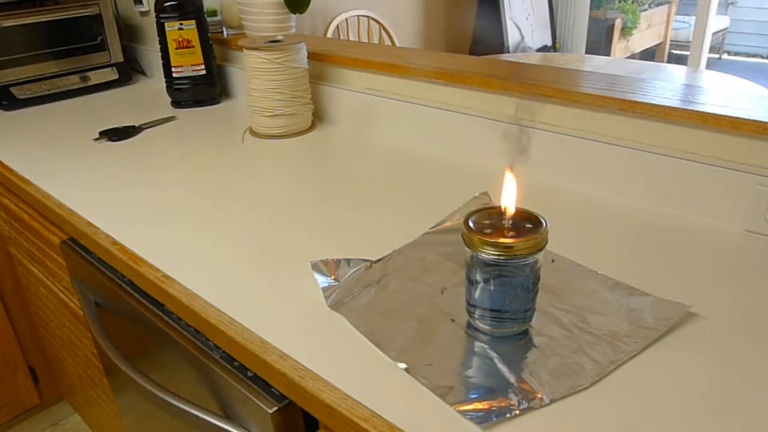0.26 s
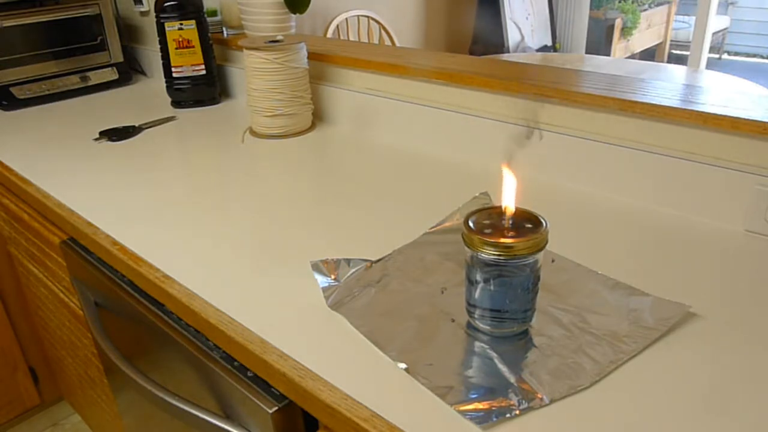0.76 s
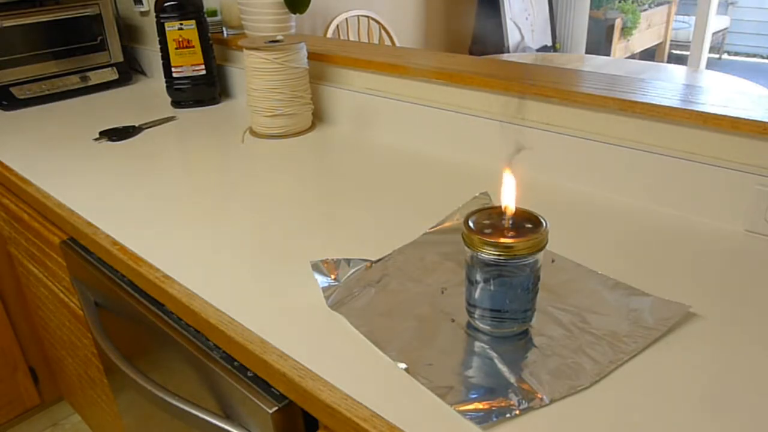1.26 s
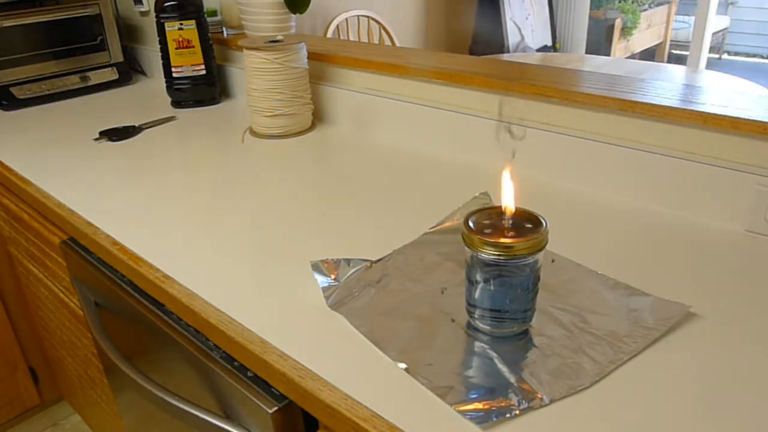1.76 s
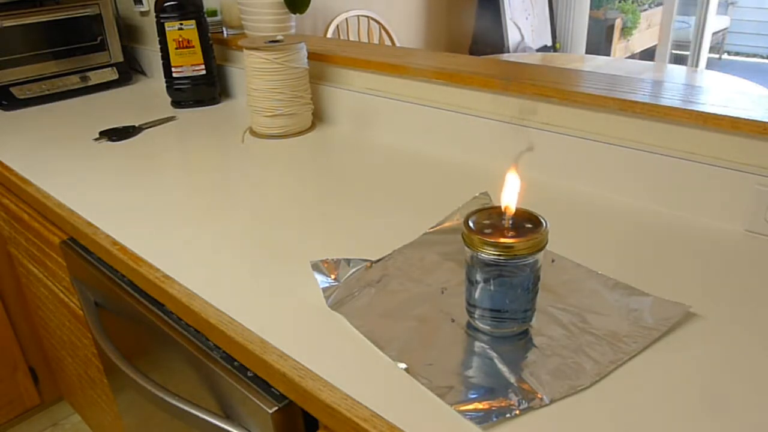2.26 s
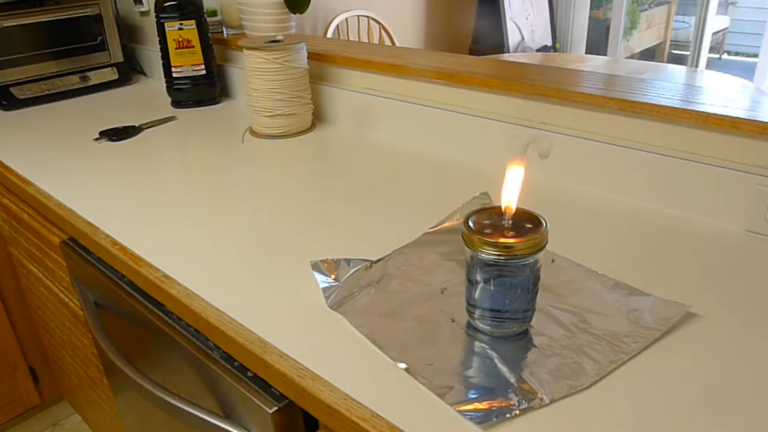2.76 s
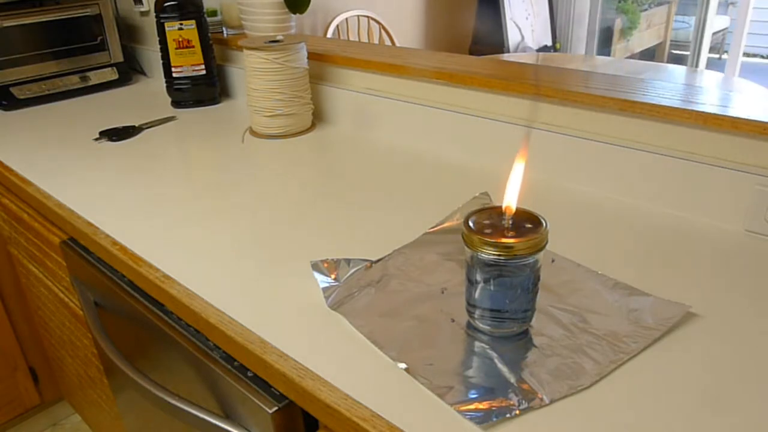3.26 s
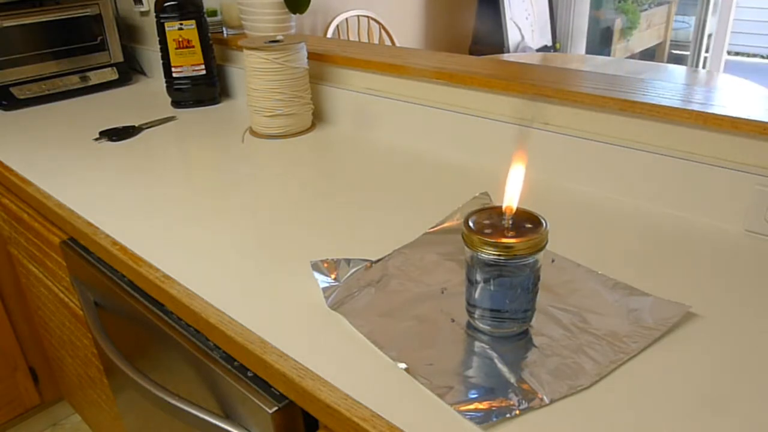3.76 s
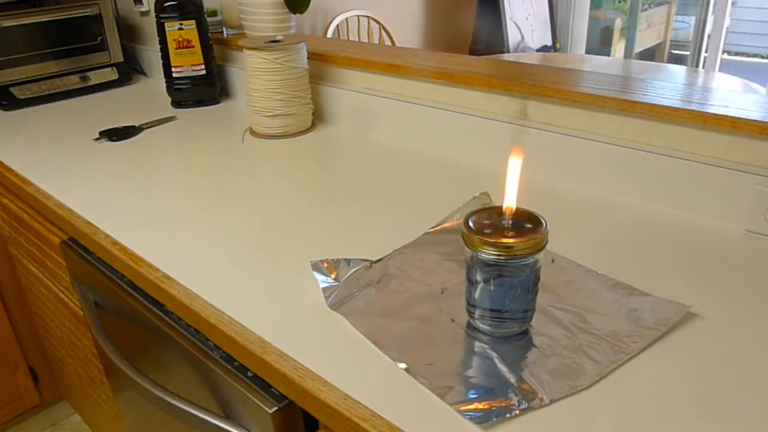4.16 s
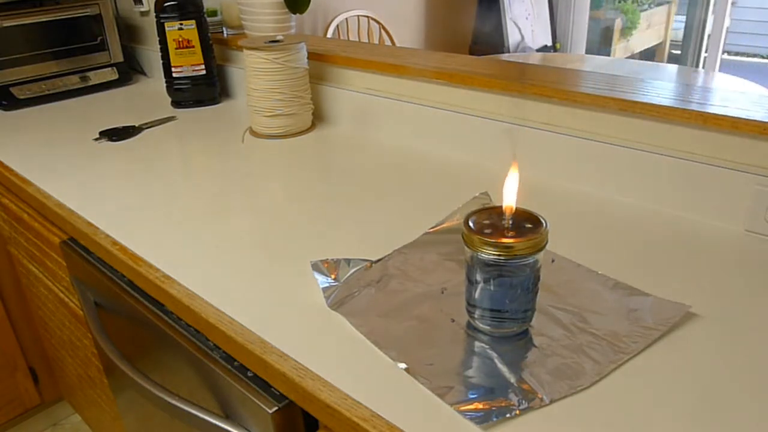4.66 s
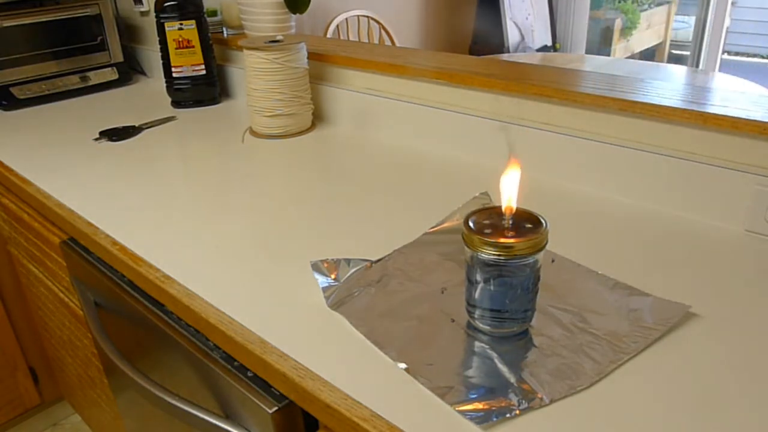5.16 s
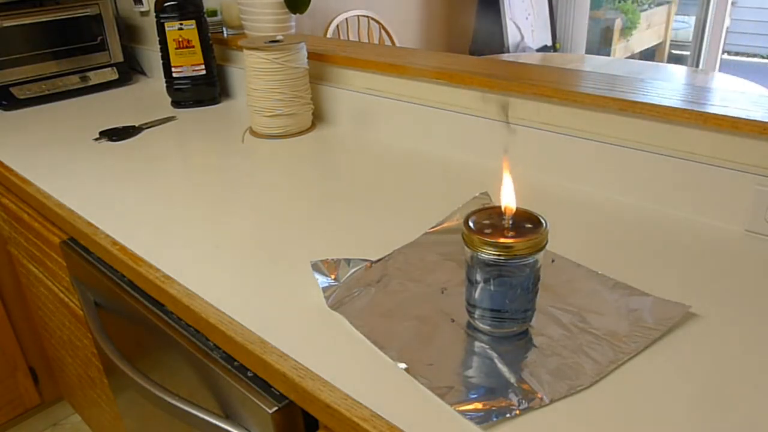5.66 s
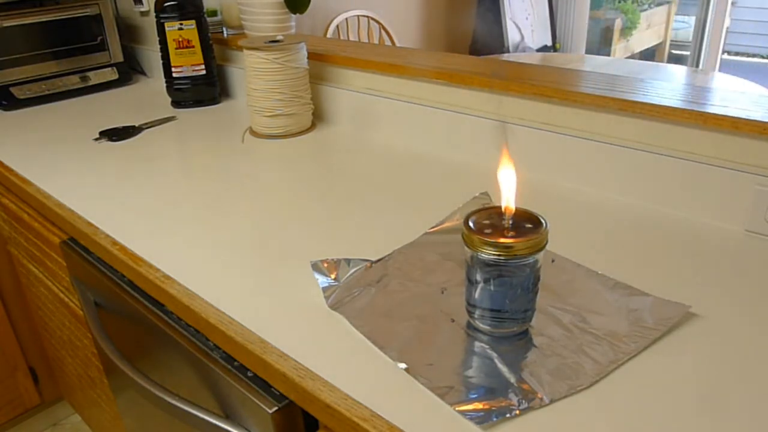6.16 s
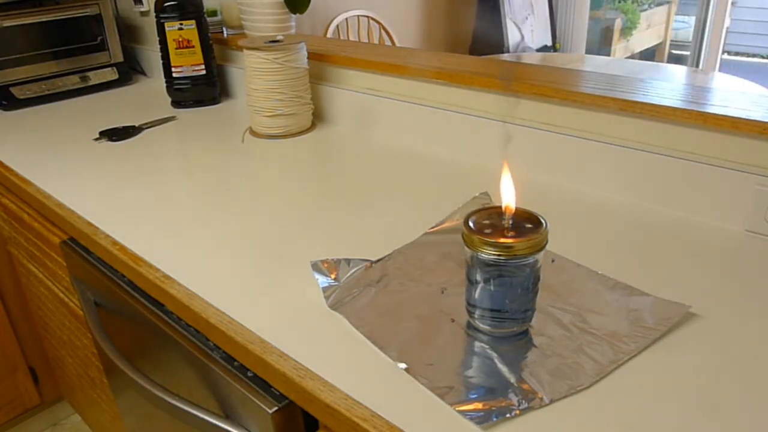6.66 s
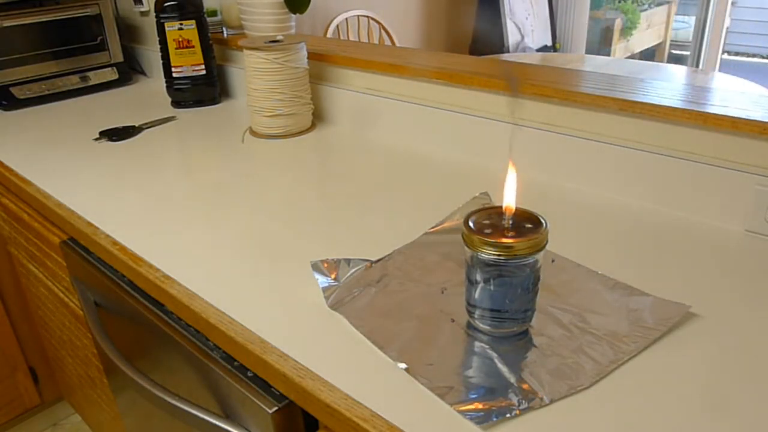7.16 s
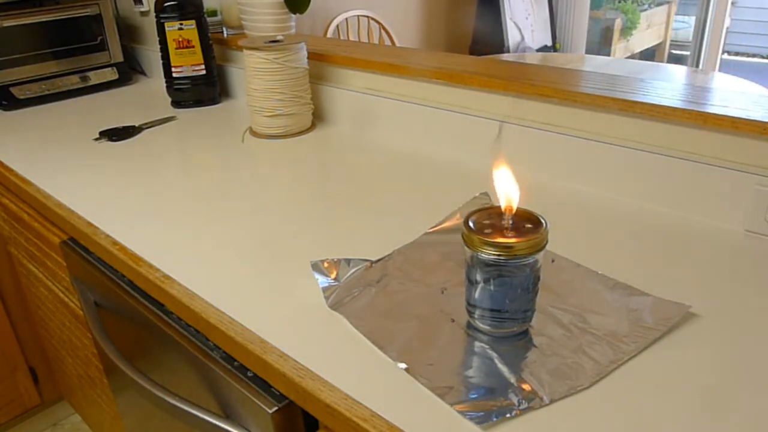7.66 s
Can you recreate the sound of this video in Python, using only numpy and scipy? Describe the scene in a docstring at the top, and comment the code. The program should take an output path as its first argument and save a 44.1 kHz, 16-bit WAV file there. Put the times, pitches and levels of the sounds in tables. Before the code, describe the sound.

Indoors over a faint appliance hum, a window unlatches, rolls roughly with ticking rollers in two shoves, then ends with a hard knock.

```python
"""A sliding window sash rolls along its gritty track in two pushes: slip noise and jolts drive track colours and modes,
and a roller ticks once a turn. Before that the latch knocks, rings frame and pane, and the sash scrapes free.
The seal hisses near the end of the travel; the sash slams on its stop, and faint stick-slip scuffs follow.
A hard-walled room, made of decaying noise, answers all but the track's ring and the low rush of an appliance."""
import sys
import numpy as np
from scipy import signal
from scipy.fft import rfft, irfft
from scipy.io import wavfile

SR = 44100
rng = np.random.default_rng(int(sys.argv[2]) if len(sys.argv) > 2 else 0)


def to_wav(sig):
    """Store sig (one row per channel, or 1-D mono) as 16-bit WAV at the path in sys.argv[1].

    Samples outside -1..1 are clipped; the rate is SR.
    """
    pcm = np.clip(np.atleast_2d(sig), -1, 1) * 32767
    pcm = np.round(pcm).astype(np.int16)
    wavfile.write(sys.argv[1], SR, pcm.T)  # frames by channels


N = 348869
TIME = np.arange(N) / SR
# Levels in dB are drive levels ahead of layer gain, colouring and room, unless marked rms.


def undb(db):
    """Decibels to amplitude gain."""
    return 10 ** (np.asarray(db) / 20)


def unit(x):
    """Scale to rms 1."""
    return x / np.sqrt(np.mean(x ** 2))


def on_log(hz, points):
    """Interpolate (hz, value) points on a log-frequency axis."""
    point_hz, value = np.transpose(points)
    return np.interp(np.log(np.maximum(hz, 1)), np.log(point_hz), value)


def through(x, response):
    """Convolve with an impulse response scaled to unit energy."""
    return signal.fftconvolve(x, response / np.linalg.norm(response))[:len(x)]


def colour(x, points, size=4096):
    """Minimum-phase filter with the given spectrum, by folding the cepstrum."""
    bin_hz = np.arange(size // 2 + 1) * SR / size
    cepstrum = irfft(np.log(undb(on_log(bin_hz, points))))
    cepstrum[1:size // 2] *= 2
    cepstrum[size // 2 + 1:] = 0
    return through(x, irfft(np.exp(rfft(cepstrum))))


def decay(t, t60_s):
    """Exponential decay by 60 dB in t60_s."""
    return np.exp(-np.log(1000) * t / t60_s)


def ring(x, modes):
    """Drive a set of decaying modes."""
    t = TIME[:SR // 2]
    response = sum(undb(db) * np.cos(2 * np.pi * hz * t) * decay(t, t60_s) for hz, db, t60_s in modes)
    return through(x, response)


def walk(rate_hz):
    """Random line through rate_hz points per second; rms 1."""
    return unit(np.interp(TIME * rate_hz, np.arange(N // 8), rng.standard_normal(N // 8)))


def slips(rate_hz, spread_db):
    """Tiny impacts of uneven size and random sign at a mean rate; rms 1."""
    size = undb(spread_db * np.minimum(rng.exponential(size=N), 4))
    hit = rng.random(N) < rate_hz / SR
    return unit(hit * size * rng.choice([-1, 1], N))


def add(out, start_s, x):
    """Mix a short sound in at start_s."""
    start = int(start_s * SR)
    out[start:start + len(x)] += x[:N - start]


def chatter(seconds, size=8192):
    """Force of one blow: micro-contacts that build up and die away; unit energy."""
    t = TIME[:size] / seconds
    fade = np.exp(-t) * (1 - np.exp(-2 * t))
    spectrum = rfft(rng.standard_normal(size) * fade)
    flat = irfft(spectrum / np.abs(spectrum))
    force = flat * np.sqrt(fade)
    return force / np.linalg.norm(force)


def stroke(start_s, attack_s, hold_s, release_db_per_s, swell_db_per_s=0):
    """Envelope of one movement: rise, hold (swelling or sagging), release."""
    t = TIME - start_s - attack_s
    rise = np.clip(1 + t / attack_s, 0, 1)
    swell_db = swell_db_per_s * np.clip(t, 0, hold_s)
    release_db = release_db_per_s * np.maximum(t - hold_s, 0)
    return rise * undb(swell_db - release_db)


# reverberation: freq_hz, t60_s
ROOM_DECAY = [(100, 1), (500, 0.57), (2000, 0.64), (5000, 0.61), (8000, 0.51), (14000, 0.36)]


def room(x, direct_db, early_db, early_s=.012):
    """Direct sound, close reflections off the window recess and a diffuse tail with its own t60 per band."""
    hz, t, cells = signal.stft(rng.standard_normal(SR), SR, nperseg=256)
    fading = cells * decay(t, on_log(hz, ROOM_DECAY)[:, None])
    tail = signal.istft(fading, SR)[1][:SR]
    response = tail / np.linalg.norm(tail)
    add(response, 0, undb(early_db) * chatter(early_s))
    response[0] += undb(direct_db)
    return through(x, response)


def scattered(x, direct_db, early_db, count=5):
    """A large sash radiates from shifting spots, each with reflections of its own."""
    shares = np.array([walk(50) for _ in range(count)])
    shares /= np.linalg.norm(shares, axis=0)
    echoes = sum(room(x * share, -np.inf, early_db) for share in shares)
    return (undb(direct_db) * x + echoes) / np.hypot(undb(direct_db), 1)


# spectrum of the air rush: freq_hz, density_db_per_hz
AIR_SPECTRUM = [(25, -57), (50, -17.5), (100, -13.5), (160, -8.5), (230, 1.5), (380, -10), (600, -11.5),
                (1100, -18), (2000, -21), (4000, -28.5), (8000, -34), (15500, -43.5)]
# slow gain heard on the air rush, sinks by the slam, then recovers: time_s, gain_db
AIR_GAIN = [(1.2, -2), (5.6, -3.5), (6.5, -2.5), (7.9, 0.5)]
# motor tones: pitch_hz, rms_db
MOTOR_TONES = [(1200, -62), (1443, -66), (2283, -66), (14923, -75.5)]
AIR_DB, DUCT_DB = -41.5, -49
TONE_WANDER_HZ = 3.61


def appliance():
    """Wavering noise for the rush of air, a duct mode, and thin motor tones of unsteady pitch."""
    gain_db = np.interp(TIME, *np.transpose(AIR_GAIN))
    rush = colour(rng.standard_normal(N), AIR_SPECTRUM) * undb(AIR_DB + .5 * walk(6))
    duct = undb(DUCT_DB) * ring(rng.standard_normal(N), [(215, 0, .05)])
    tones = np.zeros(N)
    for hz, rms_db in MOTOR_TONES:
        phase = 2 * np.pi * np.cumsum(hz + TONE_WANDER_HZ * walk(25)) / SR
        tones += undb(rms_db) * unit(np.sin(phase))
    return (rush + duct) * undb(gain_db) + tones


def rubs(rows, spectrum, slip_rate_hz):
    """Short bursts of stick-slip, each with a squeak mode of its own."""
    out = np.zeros(N)
    grain = slips(slip_rate_hz, 1.9)
    t = TIME[:SR // 4]
    for start_s, level_db, length_s, squeak_hz, squeak_db, squeak_cycles in rows:
        press = np.sin(np.pi * np.minimum(t / length_s, 1))
        burst = unit(np.roll(grain, -int(start_s * SR))[:len(t)])
        force = undb(level_db) * press * burst
        mode = [(squeak_hz, 0, squeak_cycles / squeak_hz)]
        squeak = unit(ring(ring(force, mode), mode)) * np.std(force)  # twice: steep skirts
        add(out, start_s, colour(force, spectrum) + undb(squeak_db) * squeak)
    return scattered(out, direct_db=-3, early_db=-2)


# faint scuffs: start_s, level_db, length_s, squeak_hz, squeak_db, squeak_t60_cycles (per pass)
SCUFFS = [(5.705, -70, .05, 4270, 9, 35), (6.165, -45, .065, 414, -10, 4.6),
          (6.295, -59, 0.027, 403, 14, 3.6), (6.714, -48, 0.044, 6740, -1.5, 12),
          (7.675, -45, 0.051, 6560, -4.5, 5.9)]
# spectrum of a scuff: freq_hz, density_db_per_hz
SCUFF_SPECTRUM = [(40, -27), (150, -20), (350, 9.5), (700, 9.5), (1200, 3.5), (2300, 2), (4000, -6.5),
                  (7000, -11.5), (15000, -53)]


def scuffs():
    """Faint stick-slip bursts after the sash has stopped."""
    return undb(8) * rubs(SCUFFS, SCUFF_SPECTRUM, slip_rate_hz=3000)


# latch and loose-sash knocks: start_s, level_db, edge_db, thud_db, chatter_s
KNOCKS = [(1.326, -34, -10, -14, 0.018), (1.349, -30.5, -26, -16, .011), (1.383, -21, -18, -13, 0.027),
          (1.645, -31, -6, -14, 0.015), (3.799, -37, -24, 6, 0.026), (3.927, -26, -2, -3, 0.017),
          (4.926, -30, 4.5, 4, 0.016), (5.0416, -29, -11, -3, 0.0076), (5.056, -31, -19, -2, 0.064)]
# latch and end-stop slams: start_s, level_db, edge_db, thud_db, wedge_s, rebound_s
SLAMS = [(1.4312, -20, 5.5, -18, .008, .012), (5.1372, -16, 6, -4.5, .024, 0.0039)]
SLAM_CHATTER_S = .0042
WEDGE_DB, WEDGE_EDGE_DB, REBOUND_DB = -1, -13, -6  # re slam


def blows():
    """Contacts as (start_s, force, edge_db, thud_db): a slam wedges in, strikes, rebounds; a knock is one touch."""
    for start_s, level_db, edge_db, thud_db, wedge_s, rebound_s in SLAMS:
        wedge = undb(level_db + WEDGE_DB) * chatter(wedge_s)
        strike = undb(level_db) * chatter(SLAM_CHATTER_S)
        rebound = undb(level_db + REBOUND_DB) * chatter(rebound_s)
        yield start_s - wedge_s, wedge, edge_db + WEDGE_EDGE_DB, thud_db
        yield start_s, strike, edge_db, thud_db
        yield start_s + rebound_s, rebound, edge_db, thud_db
    for start_s, level_db, edge_db, thud_db, chatter_s in KNOCKS:
        yield start_s, undb(level_db) * chatter(chatter_s), edge_db, thud_db


# spectrum of the crack: freq_hz, density_db_per_hz
KNOCK_SPECTRUM = [(100, -37), (290, 9.5), (480, 0), (750, 3.5), (1700, 6.5), (2800, 1), (5500, -5.5),
                  (8000, -12.5), (15000, -31)]
# spectrum of the metallic edge: freq_hz, density_db_per_hz
EDGE_SPECTRUM = [(1500, -23), (3500, -8), (5500, -6.5), (8000, -13.5), (11000, -13.5), (15500, -28)]
# frame modes: pitch_hz, level_db, t60_s
FRAME_MODES = [(275, -12, .35), (1222, -7, .18), (1443, -9, .25), (1660, -3, .33), (1790, -1, .18),
               (2100, -5, .17), (2433, -5, .17), (3875, -10, .22), (4245, -12, .18), (5140, -12, .18),
               (5618, -10, .22)]
# boom of the pane: freq_hz, density_db_per_hz
PANE_SPECTRUM = [(35, -22), (60, -11), (90, -2), (130, 0), (200, -4), (400, -25)]
PANE_SWAY_S = 0.032  # the heavy pane takes up a blow slowly


def knocks():
    """Latch, loose sash and end stop: each blow cracks, rings the frame and shakes the heavy pane."""
    body, edge, thud = np.zeros((3, N))
    for start_s, force, edge_db, thud_db in blows():
        add(body, start_s, force)
        add(edge, start_s, force * undb(edge_db))
        add(thud, start_s, force * undb(thud_db))
    sway = through(thud, chatter(PANE_SWAY_S))
    crack = room(undb(25.5) * colour(body, KNOCK_SPECTRUM), direct_db=-1, early_db=-5)
    click = room(undb(22.5) * colour(edge, EDGE_SPECTRUM), direct_db=2.5, early_db=1.5)
    frame = room(undb(10.5) * ring(body, FRAME_MODES), direct_db=-3, early_db=-1)
    pane = room(undb(20) * colour(sway, PANE_SPECTRUM), direct_db=0, early_db=-15)
    return crack + click + frame + pane


# damped bumper at the end of the track: freq_hz, density_db_per_hz
BUMPER_SPECTRUM = [(150, -35), (450, -8), (750, 13), (1300, -11), (2500, -7), (8000, -30)]


def bumper(start_s=5.1378):
    """The sash meets its end stop with a short, dead thwack."""
    force = np.zeros(N)
    add(force, start_s, chatter(0.0022))
    return room(colour(force, BUMPER_SPECTRUM), direct_db=15, early_db=-6)


# seal catching and letting go: start_s, level_db
CATCHES = [(4.358, -32), (4.484, -28.5), (4.558, -31), (4.65, -30)]
# spectrum of the hiss: freq_hz, density_db_per_hz
HISS_SPECTRUM = [(3000, -19), (6000, -4.5), (9500, 0), (13000, -4.5), (15500, -8)]
SEAL_START_S, SEAL_ATTACK_S, SEAL_HOLD_S, SEAL_RELEASE_DB_PER_S, SEAL_DB = 4.16, 0.3, 0.19, 77, -33
CATCH_ATTACK_S, CATCH_HOLD_S, CATCH_RELEASE_DB_PER_S = 0.0033, 0.0054, 230


def seal():
    """The weather strip drags over the frame: a fine, crackling hiss that flares where it catches."""
    drag = undb(SEAL_DB) * stroke(SEAL_START_S, SEAL_ATTACK_S, SEAL_HOLD_S, SEAL_RELEASE_DB_PER_S)
    flares = np.zeros(N)
    for start_s, level_db in CATCHES:
        flares += undb(level_db) * stroke(start_s, CATCH_ATTACK_S, CATCH_HOLD_S, CATCH_RELEASE_DB_PER_S)
    rub = np.hypot(drag, flares) * undb(walk(46)) * slips(2000, 5.3)
    return scattered(colour(rub, HISS_SPECTRUM), direct_db=-7, early_db=5)


# sash sticking in its track: start_s, level_db, length_s, squeak_hz, squeak_db, squeak_t60_cycles (per pass)
SCRAPES = [(1.66, -39, 0.1, 1414, -27, 4), (1.727, -30.5, 0.05, 1440, -14, 5),
           (1.76, -24.5, 0.032, 1220, -0.5, 5), (1.805, -28, 0.036, 970, -3, 4.2),
           (1.833, -26, 0.027, 696, -1.5, 4.2), (1.885, -27.5, 0.062, 3200, -8.5, 1.7),
           (1.935, -26.5, 0.027, 1110, 3, 8.2), (1.99, -46, .025, 1090, -11, 9),
           (2.76, -42, .056, 398, 17.5, 6.7)]
# spectrum of a scrape: freq_hz, density_db_per_hz
SCRAPE_SPECTRUM = [(100, -26), (280, -6), (480, -11), (800, -11.5), (1300, -7.5), (2200, -11), (3800, -10),
                   (7000, -21), (15500, -34)]


def sticking():
    """The sash sticks and slips in its track, mostly as it scrapes free."""
    return rubs(SCRAPES, SCRAPE_SPECTRUM, slip_rate_hz=2000)


# pushes of the hand: start_s, attack_s, hold_s, swell_db_per_s, release_db_per_s,
# rumble_db, drone_db, grit_db, tick_db
PUSHES = [(2.05, 0.14, 0.52, 10.5, 130, -28.5, -41.5, -53, -20),
          (3.763, 0.12, .53, -4, 44, -25.5, -24, -29, -36)]
COAST_DB = (-36, -37, -38.5, -24)  # rumble, drone, grit, tick at COAST_TURNS_PER_S
COAST_TURNS_PER_S, SPEED_EXPONENT = 21.8, .55
GRIT_LAG_S, GRIT_RELEASE_SHARE = 0.062, 0.29  # grit sets in after the rumble, dies away more slowly


def loads(turns_per_s):
    """Strength of rumble, drone, grit, ticks: coasting follows speed; each push adds its power."""
    relative_speed = turns_per_s / COAST_TURNS_PER_S
    power = np.outer(undb(COAST_DB), relative_speed ** SPEED_EXPONENT) ** 2
    for start_s, attack_s, hold_s, swell, release, *levels_db in PUSHES:
        effort = stroke(start_s, attack_s, hold_s, release, swell)
        grind = stroke(start_s + GRIT_LAG_S, attack_s, hold_s - GRIT_LAG_S,
                       release * GRIT_RELEASE_SHARE, swell)
        power += (undb(levels_db)[:, None] * [effort, effort, grind, effort]) ** 2
    return np.sqrt(power) * (turns_per_s > 0)


TICK_SPREAD_DB, TICK_CLICK_DB = 1.84, -6.5


def ticks(turns_per_s, strength):
    """A flat spot on a roller ticks once a turn: rows of (start_s, level_db, click_re_level_db)."""
    turns = np.floor(np.cumsum(turns_per_s) / SR)
    at = np.flatnonzero(np.diff(turns))
    chance_db = TICK_SPREAD_DB * rng.standard_normal((256, 2))[:len(at)]
    level_db = 20 * np.log10(strength[at]) + chance_db[:, 0]
    return list(zip(TIME[at], level_db, TICK_CLICK_DB + chance_db[:, 1]))


# roller modes: pitch_hz, level_db, t60_s (pitch and level vary per ping)
ROLLER_MODES = [(4000, 0, .028), (8500, -6, .02), (9400, -9, .015)]
ROLLER_DETUNE, ROLLER_SPREAD_DB = .035, 3  # detune: fraction of pitch


def roller_ping():
    """One ring of a roller, unit energy; pitch and mix shift with the point of contact."""
    t = TIME[:SR // 16]
    ping = np.zeros(len(t))
    for hz, level_db, t60_s in ROLLER_MODES:
        level_chance, pitch_chance = rng.standard_normal(2)
        tone = np.sin(2 * np.pi * hz * (1 + ROLLER_DETUNE * pitch_chance) * t)
        ping += undb(level_db + ROLLER_SPREAD_DB * level_chance) * tone * decay(t, t60_s)
    return ping / np.linalg.norm(ping)


# speed of the sash: time_s, roller_turns_per_s
SPEED = [(2.0, 32.6), (2.18, 31.2), (2.33, 38.1), (2.6, 29.5), (2.8, 31.1), (2.95, 20.1), (3.3, 13.8),
         (3.44, 8.6), (3.58, 11.3), (3.82, 15.9), (4.0, 46), (4.5, 40), (4.9, 12), (5.0, 2)]
# loudest roller ticks, with their own times and levels: start_s, level_db, click_re_level_db
LOUD_TICKS = [(2.189, -19.5, 1), (2.413, -28, 5), (2.6, -21, -0.5), (2.726, -18, -2), (2.765, -19, -11),
              (2.908, -15.5, -6.5), (3.056, -16.5, -6), (3.237, -21.5, -6), (3.389, -18, -12),
              (3.5, -26.5, 1.5), (3.591, -28, 6), (3.677, -31, 8.5), (3.813, -15.5, -29),
              (3.941, -8.5, -18), (3.974, -9.5, -19)]
# spectrum of the rumble: freq_hz, density_db_per_hz
RUMBLE_SPECTRUM = [(40, -42.5), (150, -15), (300, -9), (450, -2.5), (590, 1), (720, -4.5), (1100, -8),
                   (1500, -15), (2500, -17), (6000, -41.5)]
# spectrum of the drone: freq_hz, density_db_per_hz
DRONE_SPECTRUM = [(30, -33), (90, -20), (170, -11.5), (285, 8), (380, -6), (550, -9.5), (1200, -42.5)]
# track modes under the rollers: pitch_hz, level_db, t60_s
TRACK_MODES = [(280, -3, 0.27), (441.6, 4, .2), (597, -15, 0.23), (2710, -7.5, 0.62)]
# spectrum of the grit: freq_hz, density_db_per_hz
GRIT_SPECTRUM = [(700, -30), (1700, -0.5), (2200, -3), (2900, 4.5), (3400, 1), (4100, -0.5), (5200, -1.5),
                 (7000, -8.5), (9300, -15), (12000, -15), (15500, -31.5)]
# spectrum of the hard clicks: freq_hz, density_db_per_hz
CLICK_SPECTRUM = [(700, -14), (1500, 5.5), (3200, -0.5), (4000, 4.5), (4800, -3), (7000, -1), (9000, -3),
                  (12000, -10.5), (15500, -24)]


def rollers():
    """Rollers tick as they turn and judder over grit; track and pane boom under them."""
    turns_per_s = np.interp(TIME, *np.transpose(SPEED), left=0, right=0)
    rumbling, droning, grinding, ticking = loads(turns_per_s)
    uneven = undb(1.2 * walk(90))
    judder, sway, shiver = (slips(1500, 2.4) for _ in range(3))
    crunch = undb(1.5 * walk(110)) * slips(1300, 3.3)
    jolt, click, ping = np.zeros((3, N))
    for start_s, level_db, click_db in LOUD_TICKS + ticks(turns_per_s, ticking):
        add(jolt, start_s, undb(level_db) * chatter(0.0087))
        add(click, start_s, undb(level_db + click_db) * chatter(0.0037))
        add(ping, start_s, undb(level_db + click_db) * roller_ping())
    rumble_force = undb(-3.5) * uneven * rumbling * judder + undb(17.5) * jolt
    rumble = colour(rumble_force, RUMBLE_SPECTRUM)
    drone = undb(-4.0) * colour(uneven * droning * sway, DRONE_SPECTRUM)
    track = undb(-11.0) * ring(uneven * droning * shiver, TRACK_MODES)
    grit = undb(-3.0) * colour(uneven * grinding * crunch, GRIT_SPECTRUM)
    clicks = room(undb(16) * colour(click, CLICK_SPECTRUM), direct_db=-4, early_db=-23)
    wheel = room(undb(9) * ping, direct_db=5, early_db=-12)
    rolling = scattered(rumble + drone + grit, direct_db=-2.5, early_db=-1.5)
    return rolling + track + clicks + wheel


def scene():
    """The appliance, the window and its scuffs, as one channel."""
    window = knocks() + bumper() + seal() + sticking() + rollers()
    return (appliance() + scuffs() + window)[None]


TOP_HZ = 15800


def record(dry):
    """The microphone port has one narrow notch; the top is cut steeply."""
    notched = signal.lfilter(*signal.iirnotch(7400, 22, fs=SR), dry)
    top_cut = signal.ellip(10, .2, 80, TOP_HZ, fs=SR, output="sos")
    return signal.sosfilt(top_cut, notched)


dry = scene()
out = record(dry)
to_wav(out)
```